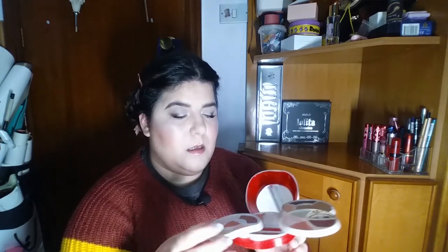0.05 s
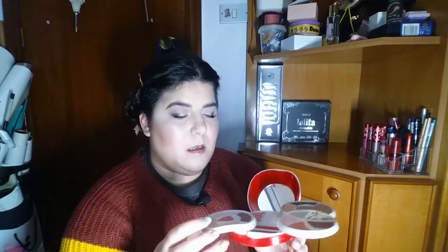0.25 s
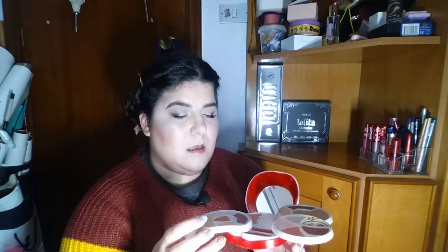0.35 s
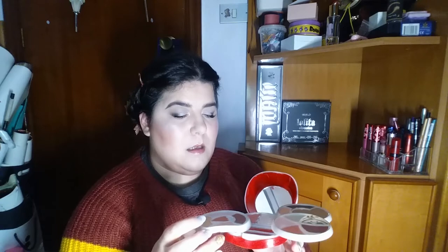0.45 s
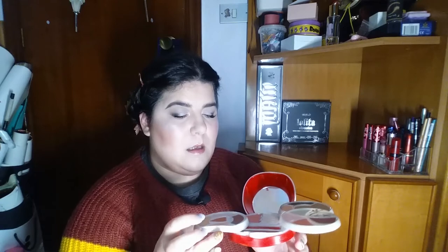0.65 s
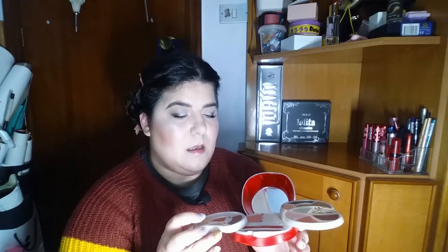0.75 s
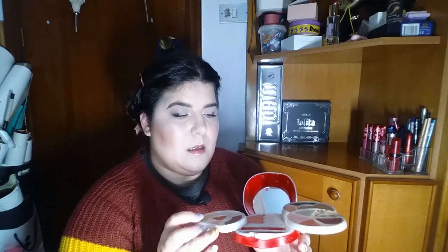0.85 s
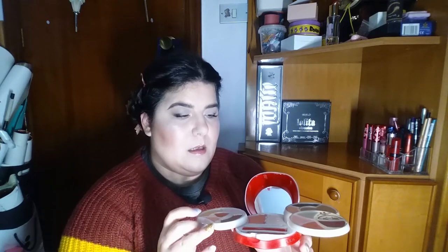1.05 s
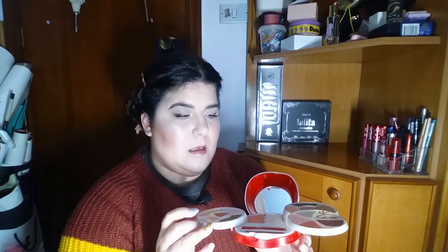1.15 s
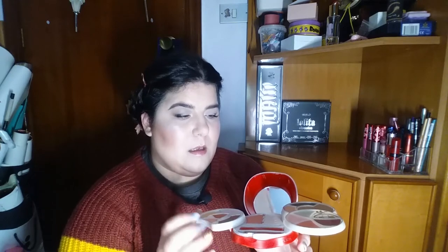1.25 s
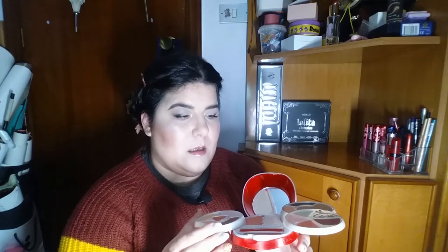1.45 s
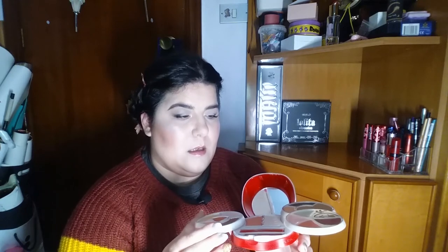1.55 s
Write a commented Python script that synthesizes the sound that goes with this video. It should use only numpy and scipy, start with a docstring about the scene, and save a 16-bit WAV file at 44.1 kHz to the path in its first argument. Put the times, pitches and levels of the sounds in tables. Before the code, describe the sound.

A plastic makeup case scrapes briefly and snaps open with a hollow clack and short rattle. Fingers and trays then make light taps and ticks over a soft sleeve rustle, close up in a small room.

```python
"""A soft rustle of hand and sleeve, close up in a small furnished room: a plastic makeup case is handled.
A tray rubs on its hinge, the catch scrapes, and the case judders and snaps open with a short rattle.
Fingers and trays then make small taps and ticks. Knocks clack the hollow shell and ring the trays, with
a faint low ring of the room; friction is noise sung through the resonances of the rubbed part.
Underneath lie the whisper of sliding plastic, a low hum and faint hiss."""
import sys
import numpy as np
from scipy import signal
from scipy.fft import rfft, irfft
from scipy.io import wavfile
from scipy.ndimage import uniform_filter1d

SR = 44100
rng = np.random.default_rng(int(sys.argv[2]) if len(sys.argv) > 2 else 0)


def to_wav(sig):
    """Store sig (one row per channel, or 1-D mono) as 16-bit WAV at the path in sys.argv[1].

    Samples outside -1..1 are clipped; the rate is SR.
    """
    pcm = np.clip(np.atleast_2d(sig), -1, 1) * 32767
    pcm = np.round(pcm).astype(np.int16)
    wavfile.write(sys.argv[1], SR, pcm.T)  # frames by channels


N = 70560

# hand and sleeve: envelope (t/s, level/dB) and EQ (f/Hz, level/dB)
RUSTLE_ENV = [(0, -62.5), (.03, -58), (.11, -64), (.2, -62.5), (.38, -72.5), (.5, -63), (.6, -70.5),
              (.8, -69.5), (.87, -66.5), (.945, -59), (1.01, -66.5), (1.11, -62.5), (1.21, -66.5),
              (1.32, -73), (1.43, -65.5), (1.48, -75), (1.6, -74.5)]
RUSTLE_EQ = [(60, -20.5), (200, -3), (330, 5), (620, 0), (900, 2), (1300, -9), (2500, -20), (6000, -38),
             (16000, -37.5)]
# trays sliding over each other: envelope (t/s, level/dB) and EQ (f/Hz, level/dB)
SLIDE_ENV = [(0, -76), (.11, -69.5), (.135, -64.5), (.21, -63.5), (.25, -62), (.48, -82.5), (.53, -66),
             (.6, -80.5), (.68, -67), (.74, -75.5), (1.1, -72.5), (1.17, -67), (1.25, -82), (1.6, -82)]
SLIDE_EQ = [(100, -21), (600, -5.5), (1100, 1), (2000, -8), (4200, -18), (6500, -28), (9800, -18),
            (12000, -24), (16000, -33)]
# envelope of the low hum: t/s, level/dB
HUM_ENV = [(0, -84), (.06, -67), (.45, -67.5), (.72, -59), (.8, -74), (.93, -71), (1.02, -70.5), (1.6, -71)]
# hiss of still air: f/Hz, level/dB
AIR_EQ = [(15, -5.5), (35, -10), (70, 0.5), (110, -3), (250, -15), (500, -12.5), (900, -19), (1400, -19),
          (2600, -27.5), (6000, -32.5), (10000, -32.5), (13000, -35.5), (16000, -37.5)]
# knocks on the case: t/s, level/dB, bass/dB, treble/dB, shell pitch/Hz
KNOCK_CUES = [(0.069, -48, -6, -17, 890), (0.2183, -39, -10, 12.5, 990), (0.2249, -27.5, -4, -3.5, 1100),
              (.2345, -33.5, 2, -25, 886), (0.2437, -6.5, 0.5, -1.5, 974.5), (.436, -53.5, 5, -6, 966),
              (.476, -50, 0.5, -13, 600), (0.501, -46, 1, -2.5, 1000), (0.5495, -42.5, -9, -3, 980),
              (.669, -50.5, 1, 8, 971), (0.68, -45, -6, -8, 960), (1.368, -54, 2, 6, 930),
              (1.4055, -41.5, 6, -11, 900)]
# dead clack of the hollow shell: f/Hz, level/dB
SHELL_EQ = [(60, -52.5), (180, -23.5), (300, -26.5), (570, -23.5), (750, -3.5), (975, 6), (1170, -6),
            (1430, -11.5), (1800, -22.5), (2600, -22.5), (3600, -23.5), (5000, -38.5), (7600, -49.5),
            (8900, -37.5), (10100, -36.5), (11500, -56.5), (16000, -60)]
# ring of the trays, with a faint low ring of the room near 330 Hz: f/Hz, level/dB, t60/s
TRAY_AND_ROOM_MODES = [(330, -53, .35), (946, -23, .13), (1190, -37, .13), (1370, -36, .11),
                       (1640, -43, .14), (2505, -32, .06), (2535, -46.5, 0.28), (4135, -50, .17),
                       (4800, -52, .15)]
# turning hinge: envelope (t/s, level/dB) and resonances (f/Hz, level/dB)
HINGE_ENV = [(.10, -79), (.13, -59.5), (.2, -61), (.24, -80)]
HINGE_MODES = [(298, 2), (1080, 2), (2000, -16), (4250, -20), (9800, -18.5)]
# catch scraping before it lets go: envelope (t/s, level/dB) and resonances (f/Hz, level/dB)
CATCH_ENV = [(.212, -77), (.217, -32.5), (.226, -31), (.232, -35), (.236, -72)]
CATCH_MODES = [(630, -1.5), (1075, -1.5), (1260, -4), (3300, -21.5)]
# loose trays after the snap: t/s, level/dB
RATTLE_ENV = [(.25, -60), (.258, -41), (.285, -50), (.34, -75.5)]
# resonances of a tray's rim: f/Hz, level/dB
RIM_MODES = [(1000, 5), (1620, 4.5), (2050, -2), (2550, -2.5), (3370, -1), (4200, -1.5), (4720, -4.5),
             (5550, -5), (8500, -5.5), (9400, -1.5), (10600, -7.5)]
# light scuffs of the rim: peak t/s, level/dB, half length/s, tilt/(dB per octave)
SCUFF_CUES = [(.313, -49.5, 0.0021, -4), (.386, -62.5, 0.0047, -1), (0.5485, -44.5, 0.0011, -7),
              (0.578, -59, 0.0035, -3.5), (0.67, -56, 0.0076, -4.5), (1.143, -64, 0.0038, -1),
              (1.161, -63.5, 0.0075, 8.5), (1.37, -62.5, .002, 1), (1.398, -51.5, .0045, 6.5)]
# room reverb: f/Hz, level/dB, t60/s
ROOM_BANDS = [(119, -5, 0.44), (352, -0.5, 0.4), (650, -15, 0.17), (990, -16.5, 0.31), (1600, -6.5, 0.13),
              (2620, -11, 0.18), (4500, -9.5, 0.2), (7000, -7.5, 0.12), (10000, -19, .2),
              (15820, -20.5, .12)]
# microphone pair: f/Hz, left minus right/dB, likeness/(0-1)
MIC_PAIR = [(60, 0.5, 0.92), (900, 0, 0.92), (2310, 1.5, 1), (3300, -4, 0.85), (4930, -5, 0.7),
            (7000, -1.5, 0.7), (9000, 6, 0.6), (13000, -1.5, .88)]

SHELL_PEAK_HZ, RIM_WIDTH_HZ = 975, 190


def amp(db):
    """Decibels to gain."""
    return 10 ** (np.asarray(db) / 20)


def unit(x):
    """Scales to rms 1."""
    return x / np.sqrt(np.mean(x ** 2) + 1e-20)


def lookup(table, hz, column=1):
    """One column of a table, interpolated over log frequency."""
    columns = np.transpose(table)
    return np.interp(np.log(hz + 1), np.log(columns[0] + 1), columns[column])


def envelope(curve):
    """Gain over time from (t/s, level/dB) points."""
    return amp(np.interp(np.arange(N) / SR, *np.transpose(curve)))


def gated(curve):
    """Envelope of a short move, silent before and after."""
    t = np.arange(N) / SR
    return envelope(curve) * (t > curve[0][0]) * (t < curve[-1][0])


def add(mix, s, sound):
    """Mixes a sound in at time s."""
    part = mix[round(s * SR):][:len(sound)]
    part += sound[:len(part)]


def eq_impulse(eq, size=4096):
    """Tightest (minimum-phase) impulse with the given EQ."""
    log_gain = np.log(amp(lookup(eq, abs(np.fft.fftfreq(size, 1 / SR)))))
    spectrum = np.exp(np.conj(signal.hilbert(log_gain)))
    return np.fft.ifft(spectrum).real[:size // 2]


def stereo(a, b, eq):
    """Two unrelated signals become mid and side of one narrow, equalised sound."""
    hz = np.fft.rfftfreq(len(a), 1 / SR)
    likeness = np.clip(lookup(MIC_PAIR, hz, column=2), 0, 1)
    mid = rfft(a) * np.sqrt((1 + likeness) / 2)
    side = rfft(b) * np.sqrt((1 - likeness) / 2)
    return irfft(np.array([mid + side, mid - side]) * amp(lookup(eq, hz)), len(a))


def resonator(modes, width_hz, tilt_db=0, attack_s=0.00062):
    """Damped ring of a plastic part, with energy 1; the tilt is per octave."""
    t = np.arange(SR // 10) / SR
    ring = sum(amp(db + tilt_db * np.log2(hz)) * np.cos(2 * np.pi * hz * t) for hz, db in modes)
    ring *= np.exp(-np.pi * width_hz * t) * (1 - np.exp(-t / attack_s))
    return ring / np.linalg.norm(ring)


def rustle():
    """Hand and sleeve brush in dull swells of noise."""
    return envelope(RUSTLE_ENV) * unit(stereo(*rng.standard_normal((2, N)), RUSTLE_EQ))


def tray_slide(slips_per_s=6000, spread_db=-1):
    """Tiny slips of plastic on plastic blur into a whisper."""
    slips = rng.standard_normal((2, N)) * (rng.random((2, N)) < slips_per_s / SR)
    slips *= amp(spread_db * np.clip(rng.standard_normal((2, N)), -2, 2))
    return envelope(SLIDE_ENV) * unit(stereo(*slips, SLIDE_EQ))


def room_tone(hum_hz=61, wander_hz=8.9, flutter_depth=.3, air_db=-68.5):
    """The bed: a low hum wavering in pitch and level, in steady hiss."""
    drift, flutter = (unit(uniform_filter1d(uniform_filter1d(noise, size=1500), size=1500))
                      for noise in rng.standard_normal((2, N)))
    phase = 2 * np.pi * np.cumsum(hum_hz + wander_hz * drift) / SR
    hum = np.sin(phase) * (1 + flutter_depth * flutter)
    hiss = stereo(*rng.standard_normal((2, N)), AIR_EQ)
    return envelope(HUM_ENV) * unit(hum) + amp(air_db) * unit(hiss)


def knock_ring(shell_hz):
    """The shell's clack, pitched by where it is struck; the trays ring on, and faintly the room."""
    t = np.arange(SR // 3) / SR
    ring = sum(amp(db - 60 * t / t60) * np.sin(2 * np.pi * hz * t) for hz, db, t60 in TRAY_AND_ROOM_MODES)
    clack = eq_impulse([(hz * shell_hz / SHELL_PEAK_HZ, db) for hz, db in SHELL_EQ])
    add(ring, 0, clack / abs(clack).max())
    return ring


def knocks(crossover_hz=2200, grit_s=0.00097, grit_db=-1, rebound_s=.00463, rebound_db=-8):
    """Taps and the snap: a rounded push with grit on top, then a weaker rebound the other way."""
    out, t = np.zeros(N), np.arange(SR // 25) / SR
    push = signal.lfilter(*signal.butter(2, crossover_hz, fs=SR), signal.unit_impulse(len(t)))
    highpass = signal.butter(2, crossover_hz, "high", fs=SR)
    for s, db, bass_db, treble_db, shell_hz in KNOCK_CUES:
        burst = rng.standard_normal(len(t)) * t * np.exp(-t / grit_s)
        grit = signal.lfilter(*highpass, amp(grit_db) * burst / np.linalg.norm(burst))
        hardness = eq_impulse([(450, bass_db), (856, 0), (1250, 0), (3500, treble_db)])  # two shelves
        contact = signal.fftconvolve(push + grit, hardness)
        knock = amp(db) * signal.fftconvolve(contact, knock_ring(shell_hz))
        add(out, s, knock)
        add(out, s + rebound_s, -amp(rebound_db) * knock)
    return out


def rub(curve, modes, width_hz):
    """Friction sings in the resonances of the hinge or the catch."""
    return gated(curve) * signal.fftconvolve(rng.standard_normal(N), resonator(modes, width_hz))[:N]


def tray_rattle(taps_per_s=640):
    """Loose trays chatter on their rims as the snap dies away."""
    taps = unit(rng.choice([-1., 1.], N) * (rng.random(N) < taps_per_s / SR))
    dull_rim = resonator(RIM_MODES, RIM_WIDTH_HZ, tilt_db=-7)
    return signal.fftconvolve(taps * gated(RATTLE_ENV), dull_rim)[:N]


def rim_scuffs(bare_grit_db=-16.5):
    """Ticks: friction swells and fades within milliseconds and rings a tray's rim."""
    out, t = np.zeros(N), np.arange(-SR // 25, SR // 25) / SR
    for s, db, half_s, tilt_db in SCUFF_CUES:
        swell = 1 / np.cosh(2 * t / half_s)
        grit = rng.standard_normal(len(t)) * swell
        scuff = signal.fftconvolve(grit, resonator(RIM_MODES, RIM_WIDTH_HZ, tilt_db))
        add(scuff, 0, amp(bare_grit_db + 2 * tilt_db) * grit)  # bright scuffs carry more bare friction
        add(out, s + t[0], amp(db) * scuff * np.linalg.norm(swell) / np.linalg.norm(scuff))
    return out


def room_reverb(x, predelay_s=0.0027, rise_s=.004):
    """Dense reflections that die at their own speed in each band."""
    size = SR // 2
    hz, frame_s, bands = signal.stft(rng.choice([-1., 1.], (2, size)), SR, nperseg=256)
    t60 = lookup(ROOM_BANDS, hz, column=2)[:, None]
    decay = np.exp(-np.log(1000) * frame_s / t60)
    equal_energy = np.sqrt(2 * np.log(1000) / (t60 * SR))
    _, reflections = signal.istft(bands * decay * equal_energy, SR, nperseg=256)
    tail = stereo(*reflections[:, :size], ROOM_BANDS)
    t = np.arange(size) / SR
    fade_in = np.clip((t - predelay_s) / rise_s, 0, 1)
    fade_out = 1 - (t / t[-1]) ** 2
    return signal.fftconvolve(x[None], tail * fade_in * fade_out, axes=1)[:, :N]


def scene():
    """The case and its reverb, over handling noise and room tone."""
    hinge = rub(HINGE_ENV, HINGE_MODES, width_hz=50)
    catch = rub(CATCH_ENV, CATCH_MODES, width_hz=70)
    case = knocks() + rim_scuffs() + tray_rattle() + hinge + catch
    return case + room_reverb(case) + tray_slide() + rustle() + room_tone()


def record(dry):
    """The microphones lean left or right by band, mostly in the treble; a steep high cut follows."""
    pan_db = lookup(MIC_PAIR, np.fft.rfftfreq(N, 1 / SR)) / 2
    panned = irfft(rfft(dry) * amp([pan_db, -pan_db]), N)
    high_cut = signal.firwin(511, cutoff=15900, window=("kaiser", 9), fs=SR)
    return signal.oaconvolve(panned, high_cut[None], "same")


dry = scene()
out = record(dry)
to_wav(out)
```